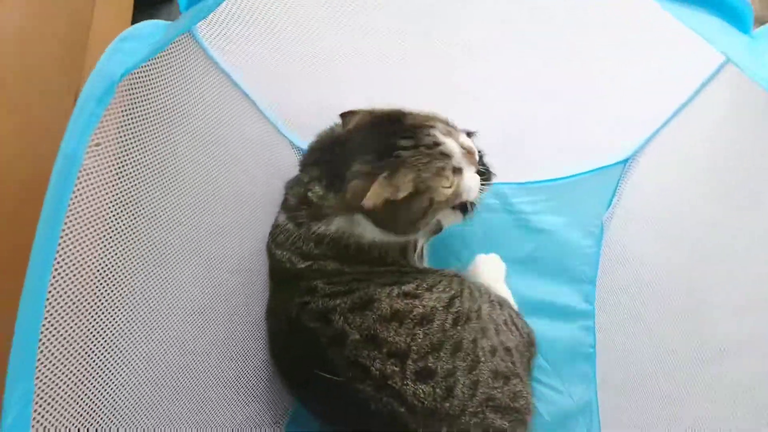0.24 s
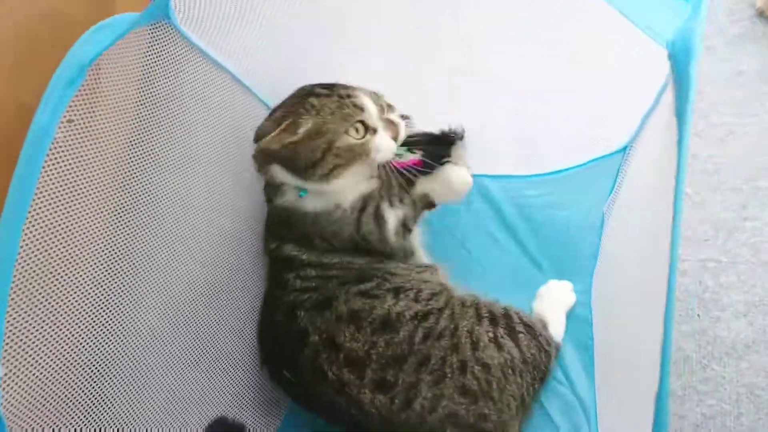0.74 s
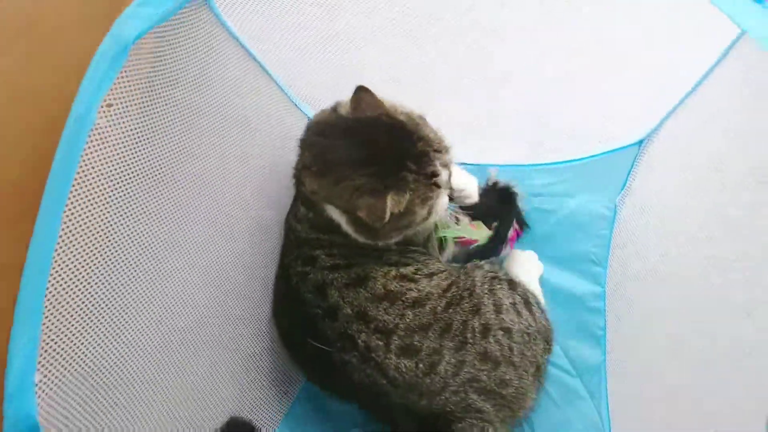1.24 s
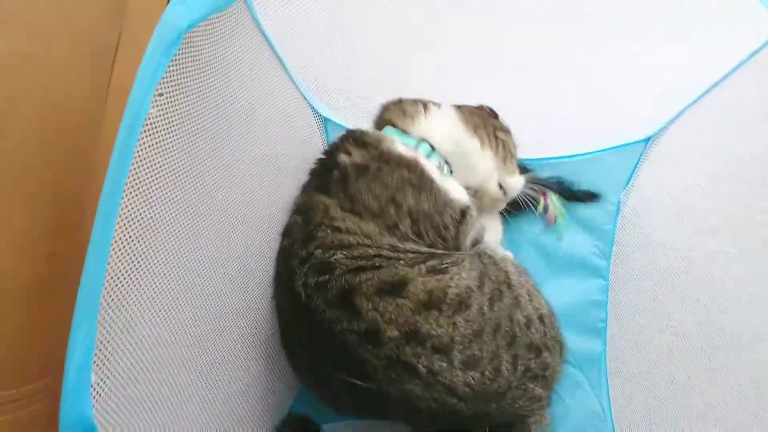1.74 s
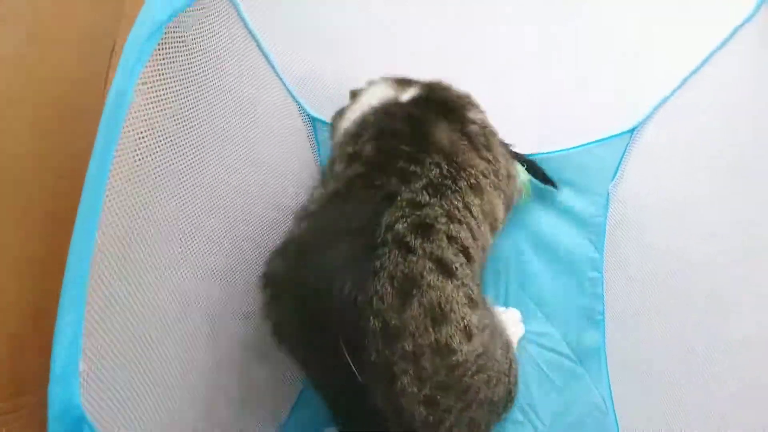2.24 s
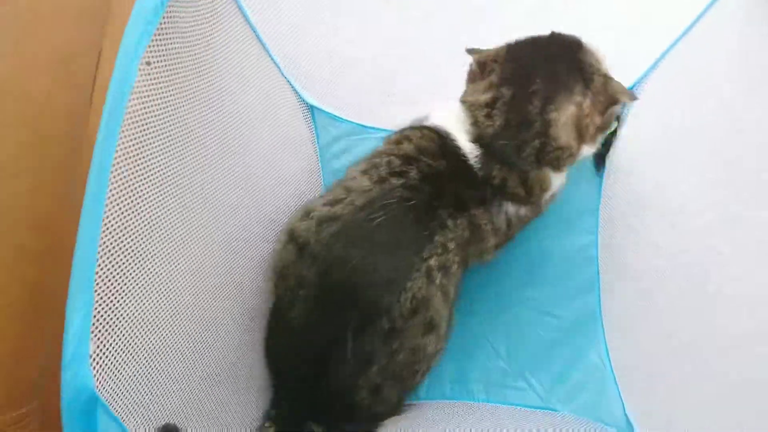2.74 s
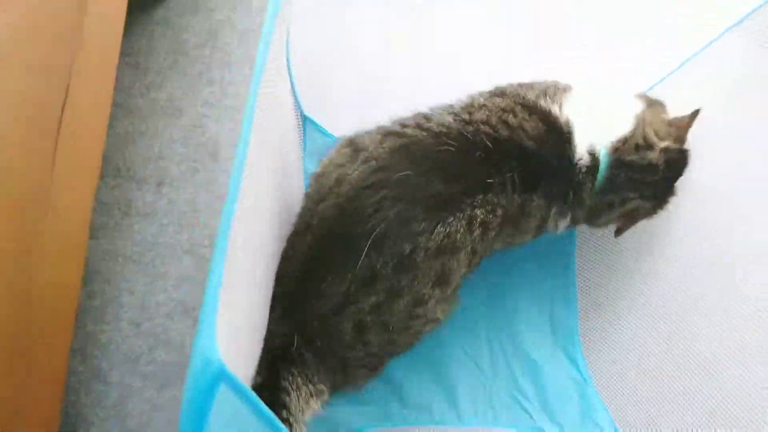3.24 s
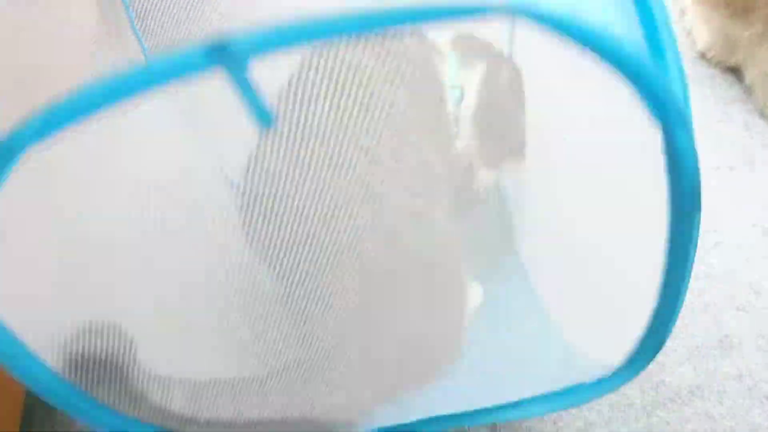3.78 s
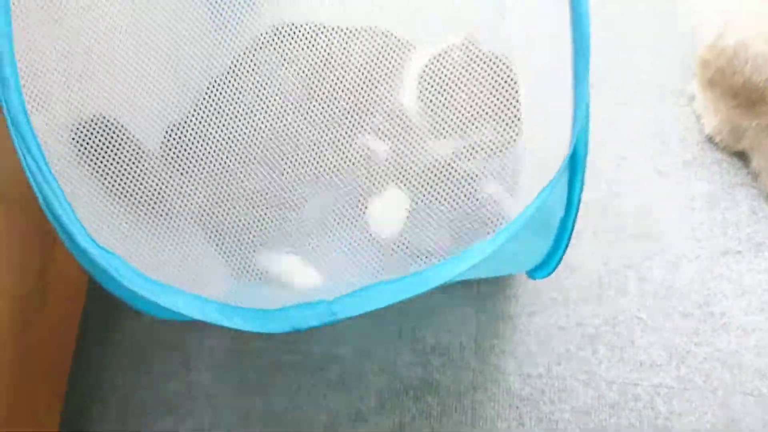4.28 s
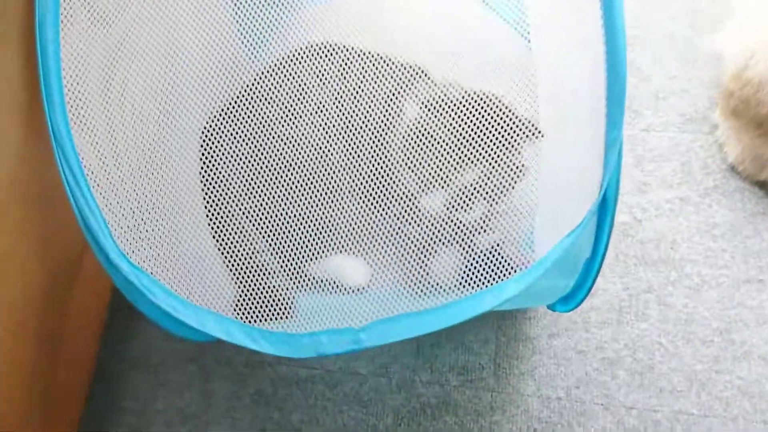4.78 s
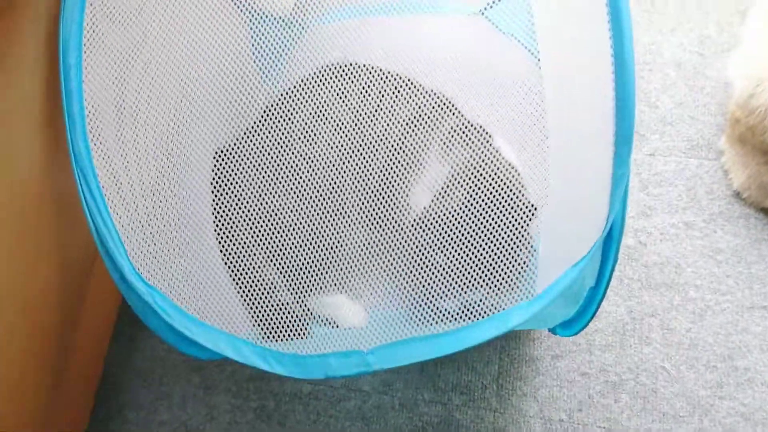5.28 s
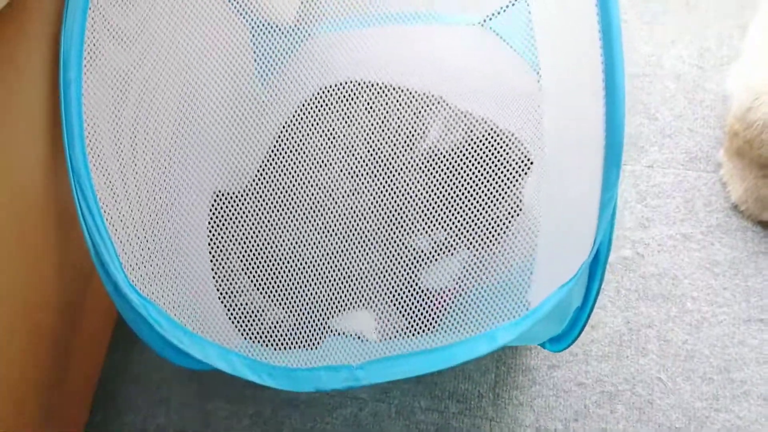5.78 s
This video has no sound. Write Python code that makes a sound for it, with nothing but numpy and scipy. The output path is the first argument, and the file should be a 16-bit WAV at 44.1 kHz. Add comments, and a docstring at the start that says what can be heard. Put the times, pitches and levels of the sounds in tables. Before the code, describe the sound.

Fur swishes and thin cloth crinkles in restless bursts while claws pluck and snap taut mesh, with a muffled little bell chinking in a quiet room.

```python
"""Cat wrestling a feather toy in a mesh pen

A cat fights a feather toy inside a pop-up nylon pen on a carpet, in a quiet room, nearer the right microphone's ear.
Filtered random grains make the fur swish and the cloth crinkle; short decaying tones make the plucked mesh,
a half muffled bell, soft thumps and hoop knocks. Shaped noise makes the room; the left side is much weaker."""
import sys
import numpy as np
from scipy import signal
from scipy.fft import rfft, irfft
from scipy.io import wavfile

SR = 44100
rng = np.random.default_rng(int(sys.argv[2]) if len(sys.argv) > 2 else 0)


def to_wav(s):
    """Save 16-bit WAV."""
    ch = np.atleast_2d(s).T  # columns
    pcm = np.round(np.clip(ch, -1, 1) * 32767)  # PCM
    wavfile.write(sys.argv[1], SR, pcm.astype(np.int16))


N = 265482
TIME = np.arange(N) / SR


def amp(db):
    """Turns decibels into a gain."""
    return 10 ** (np.asarray(db) / 20)


def unit(x):
    """Scales a sound to an rms of 1."""
    return x / np.sqrt(np.mean(x ** 2) + 1e-20)


def peaked(x):
    """Scales a sound to a peak of 1."""
    return x / (abs(x).max() + 1e-20)


def read(points, hz):
    """Reads a table between its points, on a log-frequency axis."""
    f, value = np.transpose(points)
    return np.interp(np.log(hz + 1), np.log(f + 1), value)


def add(mix, s, sound):
    """Adds a sound into the mix at time s, cut off at the end."""
    part = mix[max(round(s * SR), 0):][:len(sound)]
    part += sound[:len(part)]


def colour(x, points, size=2048):
    """Filters to a given spectrum with no sound ahead of a click, so that clicks keep their sharp front."""
    hz = abs(np.fft.fftfreq(size, 1 / SR))
    log_gain = np.log(amp(np.maximum(read(points, hz), -100)))
    # the Hilbert transform of the log gain gives the minimum phase
    taps = np.fft.ifft(np.exp(np.conj(signal.hilbert(log_gain)))).real
    return signal.fftconvolve(x, taps[:size // 2])[:len(x)]


def wander(rate_hz, count=N):
    """Smooth random drift of rms 1; changes faster than the rate fade out."""
    hz = np.fft.rfftfreq(count, 1 / SR)
    spectrum = rfft(rng.standard_normal(count)) / (1 + (hz / rate_hz) ** 4)
    return unit(irfft(spectrum, count))


def grains(per_s, spread_db, cap):
    """A random train of tiny slips, most small, a few large."""
    size = amp(spread_db * np.minimum(rng.exponential(1, N), cap))
    sign = rng.choice([-1, 1], N)
    happens = rng.random(N) < per_s / SR
    return unit(size * sign * happens)


def swell(t, rise_s):
    """Rises smoothly to 1 at rise_s, then dies away."""
    u = np.maximum(t, 0) / rise_s
    return u ** 2 * np.exp(2 - 2 * u)


def tail(t60, count=11025):
    """Dense random reflections that die away by 60 dB in t60 seconds; energy 1."""
    taps = rng.standard_normal(count) * 1000 ** (-np.arange(count) / SR / t60)
    return taps / np.linalg.norm(taps)


# a paw or flank sweeps over the cloth; levels are before the trims in swish, crinkle, bell and room:
# start_s, length_s (at full speed), swish_db (fur), fizz_db (fast sliding), crinkle_db (cloth)
STROKES = [(0.017, 0.036, -52.5, -60.5, -55.5), (0.103, 0.052, -59.5, -67.5, -59.5),
           (0.225, 0.14, -56.5, -66, -59), (0.279, 0.015, -51.5, -57, -67),
           (0.417, 0.011, -49.5, -56.5, -82), (0.565, 0.041, -59.5, -69, -55),
           (0.64, .052, -44.5, -53, -45), (0.772, 0.052, -50, -59.5, -52), (0.886, 0.016, -51, -62, -50),
           (0.971, 0.052, -49, -58.5, -53.5), (1.06, 0.037, -65, -68.5, -69),
           (1.145, 0.0076, -52, -61, -76), (1.355, 0.029, -46, -55.5, -68),
           (1.429, 0.032, -51.5, -63.5, -49.5), (1.482, 0.055, -57, -64.5, -50),
           (1.594, 0.069, -58.5, -69, -58), (1.776, 0.023, -53.5, -62, -65),
           (1.818, 0.047, -48, -59.5, -48.5), (1.902, 0.13, -51, -62, -56), (2.047, .10, -54, -62.5, -49),
           (2.16, 0.096, -53, -58.5, -58), (2.297, 0.19, -54.5, -64, -57),
           (2.506, 0.0057, -46.5, -58.5, -42), (2.575, 0.022, -57, -66, -51.5),
           (2.644, 0.063, -54, -65.5, -48), (2.774, 0.038, -55.5, -64, -51),
           (2.884, 0.066, -62, -71.5, -59.5), (2.978, 0.064, -59, -70.5, -55.5),
           (3.1, 0.082, -63.5, -69.5, -50), (3.202, 0.036, -65, -81, -63),
           (3.308, 0.021, -57, -65.5, -50.5), (3.414, 0.031, -60.5, -68.5, -50.5),
           (3.492, 0.068, -57.5, -64, -53.5), (3.564, 0.055, -56.5, -62, -59),
           (3.648, 0.081, -58, -69.5, -51.5), (3.797, 0.073, -59, -69.5, -57),
           (3.911, 0.043, -59, -70.5, -55), (4.064, 0.04, -64, -74, -58), (4.182, 0.222, -56, -62, -56),
           (4.405, 0.097, -54.5, -60.5, -53), (4.625, 0.027, -52.5, -63, -48),
           (4.678, 0.096, -58.5, -66, -51.5), (4.782, 0.16, -65, -73.5, -58), (5.013, .025, -76, -92, -59),
           (5.08, 0.051, -69, -77, -55), (5.193, 0.044, -52.5, -58.5, -59),
           (5.251, 0.059, -57.5, -62.5, -55), (5.413, 0.13, -50.5, -59.5, -51),
           (5.582, 0.062, -72, -72, -58), (5.683, 0.0068, -68, -73, -48), (5.737, 0.0082, -58, -70, -54),
           (5.797, .03, -61, -68, -55.5), (5.867, 0.021, -62.5, -76, -53)]
# between strokes the cat never lies quite still: swish_db, fizz_db, crinkle_db
FIDGET_DB = (-70, -78.5, -65.5)
# a stroke gathers speed before its start and glides to rest after its length (s for a factor of e)
ATTACK_S, RELEASE_S = 0.014, 0.017


def movement(axis):
    """The strokes as a gain over time, above a faint fidgeting; axis 0 is swish, 1 fizz, 2 crinkling."""
    t = TIME[::64]
    power = amp(FIDGET_DB[axis]) ** 2
    for start, length, *db in STROKES:
        gathering = np.minimum(t - start, 0) / ATTACK_S
        gliding = np.maximum(t - start - length, 0) / RELEASE_S
        power = power + (amp(db[axis]) * np.exp(gathering - gliding)) ** 2
    return np.interp(TIME, t, np.sqrt(power))


# tone of fur on the weave: pitch_hz, relative level_db
SWISH = [(150, -25.5), (300, -16.5), (500, -10.5), (1000, -9), (1700, -10), (2700, -2.5), (3600, -3.5),
         (4700, -1), (5500, 0), (6100, -1), (6450, -4.5), (6900, -17), (9000, -33), (15000, -42)]
# tone of fast sliding: pitch_hz, relative level_db
FIZZ = [(5500, -49), (6800, -4), (8500, 0), (10500, -5), (13000, -4), (15800, -7.5)]


def swish():
    """Fur drags over the weave: thousands of thread slips, under an uneven pressure."""
    pressure = amp(1.6 * wander(rate_hz=35))
    body = unit(colour(grains(per_s=9000, spread_db=5.0, cap=2.5), SWISH))
    fizz = unit(colour(grains(per_s=16000, spread_db=6.0, cap=1.9), FIZZ))
    return pressure * (amp(1.5) * movement(axis=0) * body + amp(3.0) * movement(axis=1) * fizz)


def pluck(t, hz):
    """A taut patch of mesh swings a few cycles."""
    return swell(t, rise_s=0.0007) * np.sin(2 * np.pi * hz * t)


# tone of creasing cloth, also used in snap: pitch_hz, relative level_db
CRINKLE = [(500, -15), (1100, -9.5), (1600, -0.5), (2000, 7), (2800, 2), (4000, 1.5), (6100, -12),
           (7000, -11.5), (15000, -29)]


def crinkle(count=14):
    """Small creases flip over in clumps as the cloth is pushed about; some pluck a patch of their own pitch."""
    t = np.arange(400) / SR
    flips = unit(colour(grains(per_s=1400, spread_db=4.5, cap=4.6), CRINKLE))
    patches = np.zeros(N)
    for hz in np.geomspace(1500, 3400, count):
        hits = grains(per_s=26, spread_db=6.0, cap=2.2)
        patches += signal.oaconvolve(hits, pluck(t, hz))[:N]
    clumps = amp(2.6 * wander(rate_hz=38))
    return movement(axis=2) * clumps * (amp(-6.0) * flips + amp(-6.5) * unit(patches))


# tone of a sharp crack, also used in hoop: pitch_hz, relative level_db
CRACK = [(500, -35), (1500, -13.5), (3000, 5), (4500, 10.5), (6200, 10.5), (7000, -12), (9000, -13),
         (11000, -22), (15800, -21)]


def snap(t, noise, pluck_db, hz, crack_db):
    """Cloth strains under a claw, a thread slips off with a crack, and the taut patch swings."""
    slip, shiver = noise
    # the strain builds before time zero and eases more slowly after it
    strain = np.exp(-np.maximum(-t / 0.001, t / 0.003))
    crack = peaked(colour(slip * (swell(t, rise_s=0.00044) + 0.27 * strain), CRACK))
    cloth = peaked(colour(shiver * strain, CRINKLE))
    return amp(pluck_db) * (pluck(t, hz) + amp(-6) * cloth) + amp(crack_db + 4.0) * crack


# a claw catches the mesh and may drag on; the crack is lifted 4 dB in snap:
# start_s, pluck_db, pitch_hz (of the plucked patch), crack_db, drag_s (length of the drag)
CATCHES = [(0.463, -38.5, 1980, -68, 0), (0.5847, -46, 2600, -34.5, 0), (0.6844, -31, 2770, -28.5, 0),
           (0.746, -33.5, 2380, -33, 0), (0.758, -36, 2300, -38, 0), (0.7718, -21, 2010, -31.5, 0),
           (0.809, -35.5, 2740, -44, .04), (1.483, -28, 1810, -34.5, 0), (1.5289, -39.5, 2010, -42, .035),
           (1.621, -38.5, 1760, -53, 0), (1.8323, -31, 2370, -34, 0), (2.0247, -29.5, 1560, -54, .03),
           (2.067, -31, 1780, -36.5, .06), (2.514, -27, 2360, -35, 0), (2.6961, -35.5, 2160, -34, 0),
           (2.7295, -29, 1950, -45, .04), (2.7704, -34, 2130, -40, 0), (2.7919, -25.5, 2030, -47, .03),
           (2.8582, -39.5, 2240, -40, 0), (3.106, -43, 2630, -34, 0), (3.1473, -33.5, 1610, -38, .045),
           (3.2495, -35, 1630, -44, .06), (3.4138, -36, 1820, -43.5, .035), (3.536, -35.5, 1950, -62, 0),
           (3.6377, -42, 2400, -46, 0), (3.8155, -42, 2370, -40.5, .04), (3.9388, -42, 1980, -48, 0),
           (4.2401, -36, 1830, -59, .06), (4.4621, -27, 1740, -34.5, 0), (4.4829, -35, 2090, -34.5, .075),
           (4.587, -38, 2830, -32, .02), (4.6364, -25.5, 1780, -39, 0), (4.6453, -31.5, 1790, -34, .05),
           (4.7045, -32, 2110, -37, 0), (4.8407, -37, 3000, -36, .08), (4.9968, -33.5, 3340, -44, 0),
           (5.0609, -36, 3120, -40, .06), (5.25, -27, 2480, -28.5, 0), (5.2554, -29, 2800, -28, 0),
           (5.2844, -30.5, 3260, -40, .03), (5.7861, -33, 3300, -31, 0), (5.7981, -32.5, 1750, -37.5, .025),
           (5.9449, -36.5, 1800, -44, .025)]
# a dragging claw slips at uneven gaps, mostly more softly than its first catch
SLIP_GAP_S, SLIP_DB, SLIP_SPREAD_DB, SLIP_SPREAD_OCTAVES = 0.016, -5, -0.66, 0.11


def snaps(count=5):
    """Each catch snaps once, then may snap again, up to count times, while the claw drags."""
    lead_s = 0.006  # room for the strain ahead of the snap
    out, t = np.zeros(N), np.arange(1800) / SR - lead_s
    for s, pluck_db, hz, crack_db, drag_s in CATCHES:
        start = s - lead_s + 0.0005
        first, *later = rng.standard_normal((count + 1, 2, len(t)))
        add(out, start, snap(t, first, pluck_db, hz, crack_db))
        delays = SLIP_GAP_S * np.cumsum(0.5 + rng.random(count))
        chance = rng.standard_normal((count, 2))
        for delay, noise, (force, patch) in zip(delays, later, chance):
            if delay < drag_s:
                slip_hz = hz * 2 ** (SLIP_SPREAD_OCTAVES * patch)
                slip = snap(t, noise, pluck_db, slip_hz, crack_db)
                add(out, start + delay, amp(SLIP_DB + SLIP_SPREAD_DB * force) * slip)
    return out


# stiff nylon gives dry, bright ticks: start_s (the tick begins 1.5 ms later), peak level_db
TICKS = [(2.7607, -36), (2.7705, -28), (3.1622, -33.5), (3.6376, -33.5), (4.5334, -34.5), (4.584, -35),
         (4.645, -30.5), (4.805, -35), (4.8114, -35), (5.0651, -33.5), (5.0866, -41), (5.283, -36),
         (5.2953, -35), (5.785, -48)]
# tone of a tick: pitch_hz, relative level_db
TICK = [(1000, -8), (3000, 5), (6000, 11.5), (7000, 0), (8800, 6), (11000, -4.5), (15800, -8)]


def ticks():
    """A stiff crease buckles: a burst of noise that peaks after about a millisecond."""
    out, t = np.zeros(N), np.arange(600) / SR
    for s, db in TICKS:
        buckle = rng.standard_normal(len(t)) * swell(t, rise_s=0.0011)
        add(out, s + 0.0015, amp(db) * peaked(colour(buckle, TICK)))
    return out


# a claw zips along the weave:
# start_s, length_s, rms level_db, start_hz and end_hz (threads crossed per second)
ZIPS = [(0.271, 0.035, -42, 4200, 3096), (1.428, 0.027, -48.5, 1777, 2890),
        (2.282, 0.066, -54.5, 2500, 3100), (2.379, 0.047, -56.5, 1436, 2180),
        (2.63, 0.038, -47, 2685, 2420), (3.652, 0.015, -39, 1744, 2670), (3.658, 0.0164, -44.5, 3156, 4000),
        (4.732, 0.045, -56, 2600, 2340), (4.768, 0.02, -54.5, 2110, 1360), (5.463, 0.066, -50, 1546, 2013)]


def zips():
    """A claw ticks over thread after thread, unevenly, at a rate that follows its speed."""
    out = np.zeros(N)
    for s, length, db, start_hz, end_hz in ZIPS:
        count = int(length * SR)
        jitter = wander(rate_hz=900, count=8192)[:count]
        pressure = wander(rate_hz=360, count=8192)[:count]
        rate_hz = np.geomspace(start_hz, end_hz, count) * (1 + 0.112 * jitter)
        turn = 2 * np.pi * np.cumsum(rate_hz) / SR
        threads = (np.sin(turn) + 0.16 * np.sin(2 * turn)) * amp(3.0 * pressure)
        add(out, s, amp(db) * unit(threads * np.hanning(count)))
    return out


# ringing tones of the bell's shell: pitch_hz, relative level_db (both vary a little per strike)
BELL = [(5890, -6.5), (5975, -13.5), (13820, -43), (14255, -21.5)]


def chink(t60):
    """One strike of the bell's shell, whose close pairs of modes beat."""
    t = np.arange(SR // 5) / SR
    chance = rng.standard_normal((len(BELL), 2))
    ring = np.zeros(len(t))
    for (hz, db), (level, tuning) in zip(BELL, chance):
        ring += amp(db + 2 * level) * np.sin(2 * np.pi * hz * (1 + 0.0015 * tuning) * t)
    return peaked(ring * (1 - np.exp(-t / 0.0024)) * 1000 ** (-t / t60))


# the pellet strikes the bell: start_s, level_db (peak, before a 0.5 dB cut),
# t60_s (time to fade by 60 dB, short when fur presses on the bell)
CHINKS = [(0.504, -46.5, .07), (0.791, -28, 0.031), (0.851, -29.5, 0.032), (0.866, -31, 0.014),
          (0.938, -38.5, 0.081), (1.008, -39, .08), (1.029, -38, 0.054), (1.061, -35, 0.013),
          (1.09, -44, 0.068), (1.16, -32, 0.036), (2.016, -40, 0.033), (2.144, -44, 0.062),
          (2.547, -39, 0.062), (2.599, -37.5, 0.076), (2.734, -39, 0.033), (2.772, -36.5, 0.034),
          (2.891, -35.5, 0.056), (4.345, -39, 0.052), (4.522, -44, 0.048), (5.322, -47.5, 0.18),
          (5.366, -51, 0.12), (5.393, -45, 0.072)]


def bell():
    """The pellet strikes the shell now and then, and rolls faintly in it whenever the cat moves."""
    rolls = grains(per_s=100, spread_db=4.0, cap=4.8) * movement(axis=0)
    rolling = signal.fftconvolve(rolls, chink(t60=0.01))[:N]
    out = amp(-61) * unit(rolling)
    for s, db, t60 in CHINKS:
        add(out, s, amp(db - 0.5) * chink(t60))
    return out


# soft thumps on the floor:
# start_s, peak level_db, pitch_hz (where it settles), puff_db (peak of the squashed cloth)
THUMPS = [(1.826, -54, 91, -46.5), (2.503, -46.5, 99, -41.5), (2.554, -48, 80, -52),
          (3.413, -32.5, 89, -47.5), (3.707, -45.5, 157, -50), (3.715, -31.5, 73, -51),
          (4.139, -44.5, 90, -54), (4.468, -45.5, 90.4, -69)]


def thumps():
    """A padded weight lands: a puff of cloth, then a few low cycles that sag in pitch."""
    out, t = np.zeros(N), np.arange(SR // 4) / SR
    puff_tone = [(50, -14), (150, -19.5), (320, -2.0), (550, -11.5), (1500, -17), (4000, -64)]
    for s, db, hz, puff_db in THUMPS:
        turns = hz * np.cumsum(1 + 0.39 * np.exp(-t / 0.017)) / SR
        shape = swell(t, rise_s=0.0076) + 0.17 * swell(t, rise_s=0.027)
        thump = peaked(shape * np.sin(2 * np.pi * turns))
        puff = colour(rng.standard_normal(len(t)) * swell(t, rise_s=0.012), puff_tone)
        add(out, s, amp(db) * thump + amp(puff_db) * peaked(puff))
    return out


# knocks on the sprung hoop:
# start_s, peak level_db, blow_hz (hardness: the pitch the blow excites most), crack_db (peak, of its sleeve)
KNOCKS = [(4.065, -33.5, 1290, -50), (4.1229, -36, 1500, -31.5), (4.1362, -38, 1300, -25),
          (4.141, -32.5, 396, -60)]
# ringing tones of the hoop in its sleeve: pitch_hz, relative level_db, t60_s (time to fade by 60 dB)
HOOP = [(294, -4, 0.074), (365, -1.5, 0.041), (461, -1, 0.085), (627, -6, 0.061), (830, 2.5, 0.012),
        (990, 4, 0.011), (1260, 0, 0.014), (1405, 1, 0.014), (2040, 1, 0.014)]


def hoop():
    """A hard knock wakes the hoop's upper modes, a soft one its lower modes; the sleeve cracks against it."""
    out, t = np.zeros(N), np.arange(SR // 5) / SR
    for s, db, blow_hz, crack_db in KNOCKS:
        ring = np.zeros(len(t))
        for hz, mode_db, t60 in HOOP:
            # modes lose 9.9 dB per octave away from the blow
            level = rng.choice([-1, 1]) * amp(mode_db - 9.9 * abs(np.log2(hz / blow_hz)))
            ring += level * np.sin(2 * np.pi * hz * t) * 1000 ** (-t / t60)
        crack = colour(rng.standard_normal(len(t)) * swell(t, rise_s=0.00068), CRACK)
        add(out, s, amp(db) * peaked(ring) + amp(crack_db) * peaked(crack))
    return out


# tone of the room noise: pitch_hz, relative level_db
ROOM = [(25, -28), (45, 13.5), (90, -3), (135, 9), (190, -0.5), (260, -4.5), (400, 6.5), (600, 8.5),
        (800, 7.5), (1300, -1.5), (2500, -3), (5800, -23), (7000, -68), (15500, -19.5)]
# faint steady tones in the room: pitch_hz, width_hz, rms level_db
DRONE = [(90, 27, -70), (585, 45, -76), (803, 30, -75)]


def room():
    """Steady room noise with a few blurred tones, and a low rumble as the pen shifts under the cat."""
    hz = np.fft.rfftfreq(N, 1 / SR)
    air = unit(irfft(rfft(rng.standard_normal(N)) * amp(read(ROOM, hz)), N))
    tones = np.zeros(N)
    for f, width, db in DRONE:
        # slow random drift of two quarter-turned waves blurs the pitch
        turn = 2 * np.pi * f * TIME
        blurred = wander(width / 2) * np.sin(turn) + wander(width / 2) * np.cos(turn)
        tones += amp(db) * unit(blurred)
    rumble_tone = [(35, -19.0), (70, -19), (110, 8.5), (220, -5.0), (400, -13.0), (900, -12.5), (3000, -90)]
    rumble = unit(colour(rng.standard_normal(N), rumble_tone))
    return amp(-65.5) * air + tones + amp(-19.0) * movement(axis=2) * rumble


# the weak left microphone: pitch_hz, level_db (left minus right)
LEFT = [(60, -9), (200, -10.5), (380, -4.5), (700, -0.5), (1290, -14.5), (2380, -17.5), (4400, -20),
        (6000, -26.5), (8100, -12.5), (15000, -17.5)]
# likeness of the two microphones: pitch_hz, likeness (0 to 1)
SAME = [(60, .93), (130, .95), (290, .87), (640, .7), (1400, .55), (3100, .4), (6800, .2), (15000, .1)]


def scene():
    """The pen and its faint room echo reach the right microphone clearly, the left one dull and scattered."""
    pen = swish() + crinkle() + snaps() + ticks() + zips() + bell() + thumps() + hoop()
    echo = signal.fftconvolve(pen, tail(t60=0.26))[:N]
    right = rfft(pen + amp(-11.5) * echo + room())
    hz = np.fft.rfftfreq(N, 1 / SR)
    same = np.clip(read(SAME, hz), 0, 1)
    # the left port lies a little farther from the pen: 3 samples of delay
    direct = np.exp(-2j * np.pi * hz * 3 / SR)
    scattered = rfft(tail(t60=0.16), N)
    balance = amp(read(LEFT, hz))
    left = right * balance * (same * direct + np.sqrt(1 - same ** 2) * scattered)
    # lifts both sides to make up for the weak left in their average
    return irfft(np.array([left, right]) * 2 / (1 + same * balance), N)


def record(dry):
    """The recorder's low cut at 55 Hz and its band limit at 15800 Hz."""
    low_cut = signal.butter(4, 55, "highpass", fs=SR, output="sos")
    band_limit = signal.firwin(511, 15800, window=("kaiser", 9), fs=SR)
    return signal.oaconvolve(signal.sosfilt(low_cut, dry), band_limit[None], "same")


dry = scene()
out = record(dry)
to_wav(out)
```